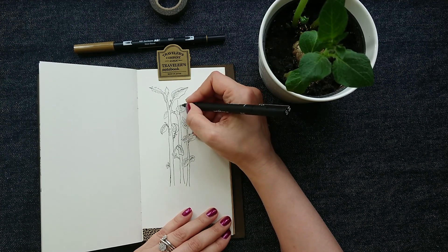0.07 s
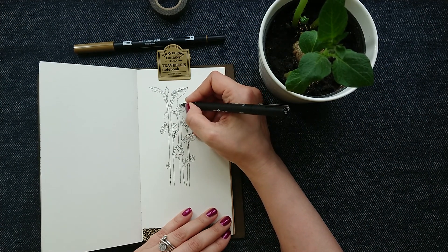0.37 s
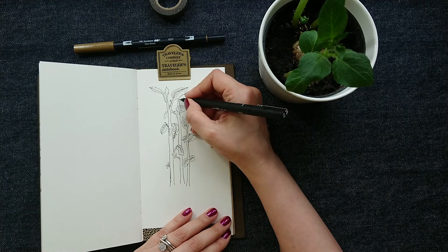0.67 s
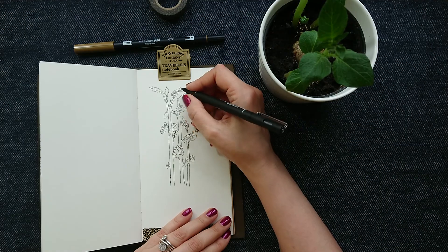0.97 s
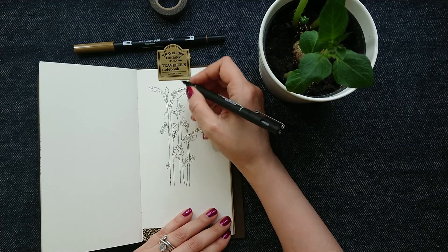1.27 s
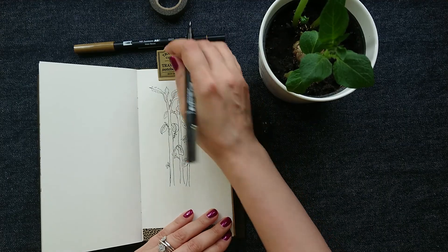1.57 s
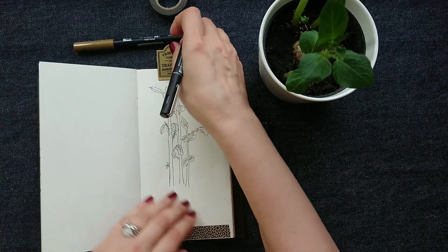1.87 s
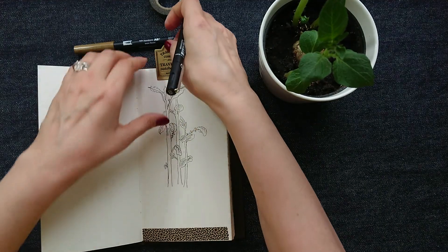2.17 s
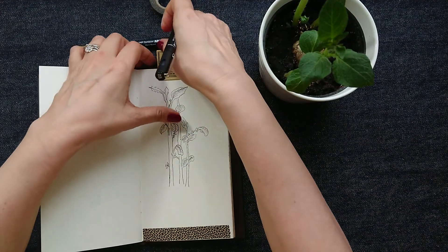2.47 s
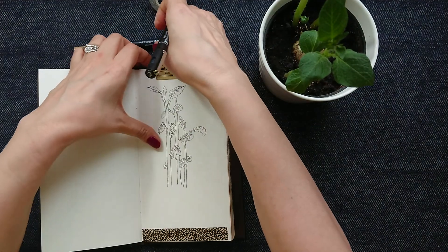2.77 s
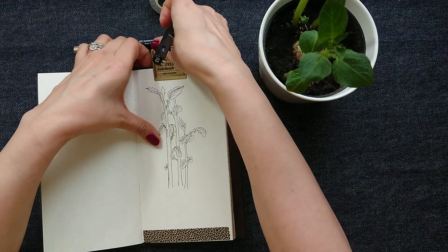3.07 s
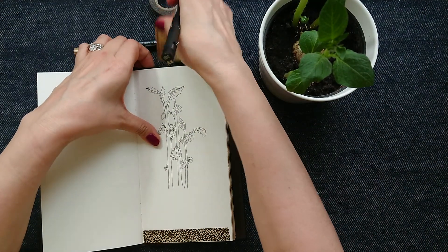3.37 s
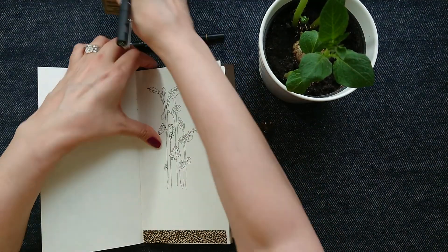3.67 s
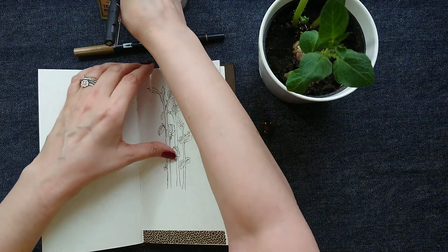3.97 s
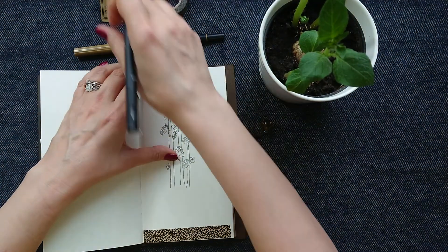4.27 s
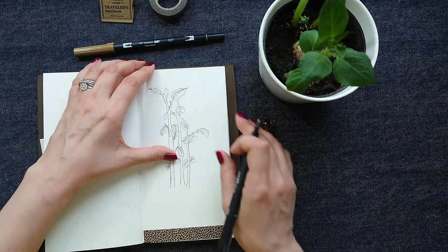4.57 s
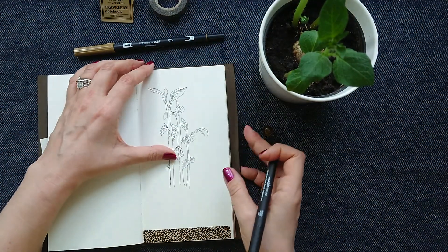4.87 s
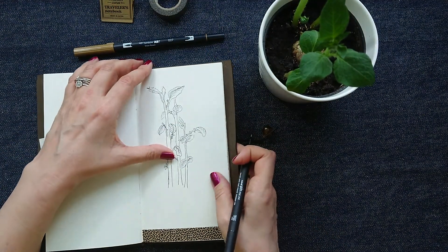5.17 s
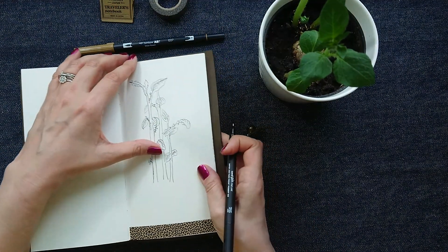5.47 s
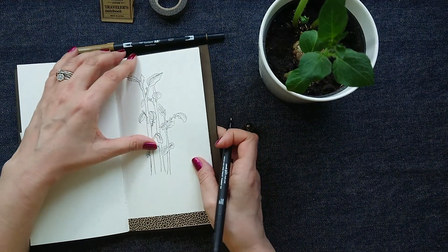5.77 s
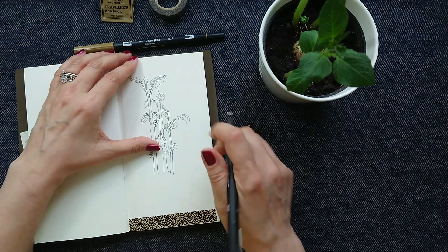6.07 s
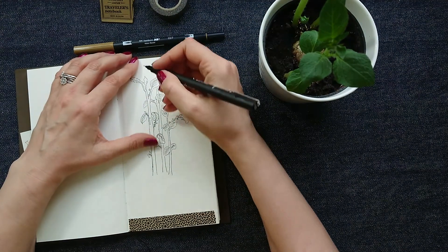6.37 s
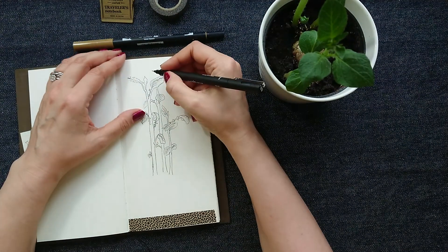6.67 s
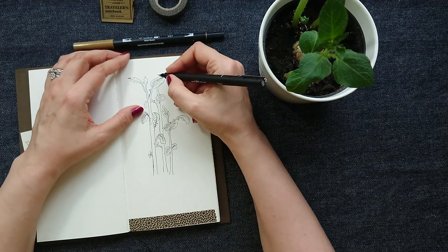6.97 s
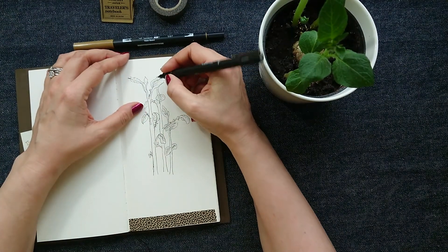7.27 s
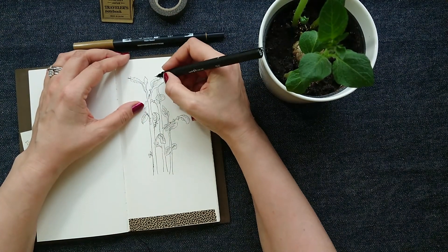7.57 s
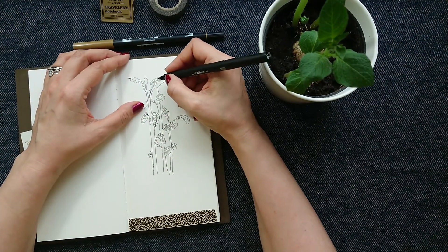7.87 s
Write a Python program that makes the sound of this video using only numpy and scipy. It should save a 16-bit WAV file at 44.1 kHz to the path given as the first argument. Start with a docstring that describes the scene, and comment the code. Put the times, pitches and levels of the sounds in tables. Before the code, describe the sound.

Soft, close hisses of skin on paper open the scene, followed by light clicks and taps as a metal clip is worked off a notebook. It comes loose with a thin snap, and two knocks on the table follow, the second the loudest, with a tiny metallic ring. Dull rubbing on cloth and papery swishes continue until a pen lightly ticks. The room is small and still, with a faint low hum.

```python
"""On a cloth-covered table in a quiet room, someone draws in a notebook, skin hissing over the page.
They stop to take off its metal clip, which clicks, snaps free and is set down with two knocks:
impacts that excite the damped modes of clip and table. Hands and forearms then slide over paper and
cloth with stick-slip friction, nudging the book, and the pen returns to the page with a tick.
A faint hum lies under it all."""
import sys
import numpy as np
from scipy import signal
from scipy.fft import rfft, irfft, next_fast_len
from scipy.io import wavfile
from scipy.ndimage import map_coordinates

SR = 44100
rng = np.random.default_rng(int(sys.argv[2]) if len(sys.argv) > 2 else 0)


def to_wav(s):
    """Save 16-bit WAV."""
    ch = np.atleast_2d(s).T  # columns
    pcm = np.round(np.clip(ch, -1, 1) * 32767)  # PCM
    wavfile.write(sys.argv[1], SR, pcm.astype(np.int16))


N = 354034
TIME = np.arange(N) / SR


# The clip snaps or is touched, then lands. Each row: start in seconds, strength in dB,
# lower and upper cutoff in Hz.
CLIP_SNAPS = [(1.668, -8, 1200, 9400), (1.6695, -15, 1190, 9000), (2.7097, -5.5, 1460, 6000),
              (3.4652, 8, 350, 7440), (3.4659, 8, 4970, 15200), (3.4666, 1, 4000, 15000),
              (3.4685, 3, 1490, 13000), (5.1465, -3, 13000, 15500)]
CLIP_LANDING = [(4.1087, 0.5, 2000, 14990)]
# Its modes, held and free. Each row: frequency in Hz, relative level in dB, T60 in seconds.
HELD_MODES = [(635, -55.5, 0.028), (2400, -50, 0.0057), (5000, -48.5, 0.004), (6150, -46, 0.0031),
              (10000, -44, 0.0055), (12700, -40, 0.0033), (15100, -45, 0.0033)]
FREE_MODES = [(6295, -60.5, 0.21), (6370, -47, 0.037), (10950, -51.5, 0.034), (13450, -66.5, 0.11)]
def metal_clip():
    """Damping: fingers stop the jaws' vibration quickly, while the released clip rings on."""
    held = struck(CLIP_SNAPS, HELD_MODES, crack_db=-52, crack_t60=0.0056)
    free = struck(CLIP_LANDING, FREE_MODES, crack_db=-46.5, crack_t60=0.02)
    return held + free


# Blows on the table. Each row: start in seconds, strength in dB, lower and upper cutoff in Hz.
TABLE_BLOWS = [(2.307, -33.5, 1500, 3500), (2.4592, -31, 1710, 2580), (2.5078, -30, 1036, 2700),
               (2.5125, -34, 950, 2300), (2.516, -29, 1030, 2500), (2.559, -29, 3000, 5030),
               (2.576, -44.5, 300, 1200), (2.7088, -31.5, 120, 680), (2.8098, -29, 1400, 4000),
               (3.2048, -32, 1420, 3260), (3.392, -29, 1900, 2400), (3.8452, -10, 40, 510),
               (3.8455, -26, 493, 1280), (4.107, -10, 287, 1880), (4.1083, 1, 40, 1640),
               (4.7215, -31, 1500, 4500), (4.968, -41, 249, 700), (4.982, -39, 250, 700),
               (6.017, -33, 60, 550), (6.0175, -41.5, 1300, 2200), (6.027, -39, 99.4, 650),
               (6.381, -41, 1300, 1900), (7.5095, -29.5, 1900, 2298)]
# Modes of table and book. Each row: frequency in Hz, relative level in dB, T60 in seconds.
TABLE_MODES = [(44, -42.5, .42), (68, -43, 0.23), (91, -40, 0.063), (121.9, -40, .32), (158.95, -33, 0.14),
               (207, -35, 0.03), (238, -43, .27), (285, -16, 0.025), (387, -43.5, .22), (590, -43, 0.39),
               (660, -12.5, 0.023), (950, -12, 0.019), (1343, -19, .018), (1720, -24, 0.013),
               (2017, -24, .014), (2490, -33.5, .01), (988, -49, .45), (309, -44, 0.21), (1097, -40, .22)]
def table_knocks():
    """Impact excitation: each blow sets the table top ringing at its natural frequencies."""
    return struck(TABLE_BLOWS, TABLE_MODES, crack_db=-19.5, crack_t60=0.0054)


# Low thuds of the table: soft bumps, and the bass of the two loud knocks.
# Each row: start in seconds, relative level in dB, frequency in Hz.
LOW_THUDS = [(0.108, -54, 120), (.52, -61, 70), (1.771, -48.5, 85), (1.773, -52.5, 206), (2.257, -51, 370),
             (2.439, -51.5, 63), (2.708, -51, 91), (3.251, -52.5, 240), (3.401, -51, 150),
             (3.8432, -39, 90), (4.109, -32, 125), (4.721, -44, 246), (6.018, -51.5, 114),
             (7.101, -56.5, 80), (7.51, -47.5, 267)]
def table_thuds(t60_cycles=7.8, rise_s=0.0014, gain_db=3.0):
    """Damped oscillation: a blow through the cloth pushes the table top, which swings a few times."""
    out, t = np.zeros(N + SR), TIME[:SR // 4]
    for start_s, db, hz in LOW_THUDS:
        envelope = (1 - np.exp(-t / rise_s)) * decay(t, t60_cycles / hz)
        start = round(start_s * SR)
        out[start:start + len(t)] += from_db(db + gain_db) * envelope * np.sin(2 * np.pi * hz * t)
    return out[:N]


# The pen's contacts. Each row: start in seconds, strength in dB, lower and upper cutoff in Hz.
PEN_CONTACTS = [(4.1035, -8.5, 2986, 6240), (7.0095, -1.5, 3500, 6130), (7.0112, -10, 3510, 6000),
                (7.1385, -22, 2000, 4460)]
# Its barrel's modes. Each row: frequency in Hz, relative level in dB, T60 in seconds.
BARREL_MODES = [(4330, -41.5, 0.016), (4800, -39, 0.0095), (5750, -39.5, 0.01)]
def pen_ticks():
    """Free vibration: the struck barrel's high, heavily damped modes are heard as a tick."""
    return struck(PEN_CONTACTS, BARREL_MODES, crack_db=-54, crack_t60=0.008)


def struck(contacts, modes, crack_db, crack_t60, scatter_db=1.0):
    """Modal superposition: a contact cracks and rings the modes, duller if soft, thinner if light."""
    out, t = np.zeros(N + SR), TIME[:SR // 2]
    hz, mode_db, t60 = np.transpose(modes)
    rings = np.sin(2 * np.pi * hz[:, None] * t) * decay(t, t60[:, None])
    signs = (-1) ** np.arange(len(modes))
    for start_s, db, low_hz, high_hz in contacts:
        strengths = signs * from_db(mode_db + scatter_db * rng.standard_normal(len(modes)))
        crack = from_db(crack_db) * rng.standard_normal(len(t)) * decay(t, crack_t60)
        thinned = cut(strengths @ rings + crack, low_hz, "high")
        start = round(start_s * SR)
        out[start:start + len(t)] += from_db(db) * cut(thinned, high_hz, "low", order=3)
    return out[:N]


# Skin strokes the page. Each row: start and length in seconds, fraction spent speeding up,
# relative level in dB, treble offset in dB.
SKIN_STROKES = [(1.09, 0.19, 0.81, -77.5, 2), (1.435, 0.065, .4, -82, 11), (1.72, 0.188, 1, -72.5, 2.5),
                (2.157, .13, 0.12, -63, -3), (2.275, 0.069, 0.38, -66.5, -6), (2.36, 0.13, .55, -68.5, -1),
                (2.76, 0.2, 0.6, -72.5, 0), (3.26, 0.14, 0.95, -75, -3), (3.61, .25, 0.74, -74, 0),
                (3.81, .08, 0.74, -68, 2.5), (3.88, 0.21, 0.42, -71.5, 1), (4.43, 0.22, .6, -70.5, -10),
                (4.655, .085, 0.18, -75, 6.5), (4.73, 0.1, 0.68, -74, 6.5), (4.98, 0.23, 0.46, -76.5, 8),
                (5.175, 0.053, 0.46, -73, 5.5), (5.25, 0.49, 0.21, -73.5, -5),
                (5.415, 0.042, 0.36, -66, -8), (5.602, 0.077, 0.39, -59, -15), (5.79, 0.24, 0.74, -77, 0.5),
                (6.195, 0.049, 0.67, -70.5, -2), (6.395, 0.083, .5, -67.5, 2.5),
                (6.46, .22, 0.22, -66, 3.5), (6.58, 0.22, 0.4, -69.5, -7), (6.9, .18, 0.8, -73, 0)]
# The hiss of paper. Each row: frequency in Hz, relative spectral density in dB.
PAPER_SPECTRUM = [(900, -23.5), (2500, -3), (3700, -7.5), (4500, -3.5), (6000, -2), (7600, -1),
                  (9300, -2.5), (11000, -3.5), (12500, -3), (15500, -6.5)]
def paper_hiss(gap_delay_s=0.00016, reflection=0.33, wander=0.11, gain_db=4, light_touch_db=2):
    """Comb filtering: the hiss of skin on paper meets its echo from the changing gap under the hand."""
    stroke, stroke_treble = sliding(SKIN_STROKES)
    idle = fidget(-84)
    hiss = coloured(stick_slip(catches_per_s=16000, spread_db=1.0, judder_db=1.5), PAPER_SPECTRUM)
    lag = gap_delay_s * SR * (1 + wander * drift(19))
    hiss = hiss + reflection * map_coordinates(hiss, [np.arange(N) - lag], order=3)
    idle_treble = from_db(light_touch_db) * idle  # a light touch favours the top octave
    body = np.hypot(stroke, idle) * cut(hiss, 10000, "low", order=3)
    treble = np.hypot(stroke_treble, idle_treble) * cut(hiss, 9200, "high", order=3)
    return from_db(gain_db) * (body + treble)


# Forearm or book drags on the cloth. Each row: start and length in seconds, fraction spent
# speeding up, relative level in dB, rumble offset in dB.
CLOTH_DRAGS = [(.38, 0.28, 0.33, -80, 8.5), (1.76, 0.15, 0.89, -63, 5), (1.895, 0.4, 0.2, -73.5, 6),
               (2.14, 0.23, 0.48, -70, 3.5), (2.36, 0.14, 0.31, -69.5, 1), (2.78, 0.21, 0.25, -73.5, -2),
               (2.98, 0.13, 0.74, -73, 7), (3.23, .12, .7, -73, -8), (3.335, 0.08, 0.88, -63, -8),
               (3.5, 0.92, 0.6, -81, -4), (4.42, 0.41, 0.28, -71, -18), (4.62, 0.36, 0.42, -67, 3.5),
               (4.92, .1, 0.64, -64, 3.5), (5.0, 0.27, 0.12, -67, -0.5), (5.25, 0.41, 0.13, -69, -8),
               (5.602, 0.087, 0.3, -66, -9), (5.78, 0.31, 0.33, -72, -14), (6.195, 0.049, .5, -73, -3),
               (6.45, 0.34, 0.76, -70.5, -11), (6.82, .26, 0.86, -73, -6)]
# The cloth's rub and the table's rumble. Each row: frequency in Hz, relative spectral density in dB.
RUB_SPECTRUM = [(200, -15), (400, -3), (620, -2), (900, -1), (1300, 0.5), (1900, -1), (2300, -8.5),
                (3100, -11), (5000, -20.5), (10000, -39)]
RUMBLE_SPECTRUM = [(25, -24), (45, 0.5), (60, 5), (85, -10), (118, -1), (150, -13), (280, -5.5),
                   (380, -15.5), (700, -25), (2000, -50)]
def cloth_rub(rub_gain_db=1.0, rumble_gain_db=-2.5):
    """Forced vibration: dragging over the weave gives a dull rub and makes the table rumble."""
    drag, drag_rumble = sliding(CLOTH_DRAGS)
    rub_level = from_db(rub_gain_db) * np.hypot(drag, fidget(-82.5))
    rumble_level = from_db(rumble_gain_db) * np.hypot(drag_rumble, from_db(-75))  # never quite still
    rub = coloured(stick_slip(catches_per_s=9000, spread_db=1.0, judder_db=2.0), RUB_SPECTRUM)
    rumble = coloured(stick_slip(catches_per_s=230, spread_db=-1.0, judder_db=-0.5), RUMBLE_SPECTRUM)
    return rub_level * rub + rumble_level * rumble


def stick_slip(catches_per_s, spread_db, judder_db):
    """Stick-slip friction: fibres catch and let go in tiny uneven clicks while the pressure judders."""
    unevenness = from_db(spread_db * np.minimum(rng.exponential(1, N), 4))
    clicks = unevenness * rng.standard_normal(N)
    catches = rng.random(N) < catches_per_s / SR
    return clicks * catches * from_db(judder_db * drift(70))


def sliding(movements, speed_exponent=0.58):
    """Friction noise grows as a power of speed; returns its envelope without and with the offsets."""
    power, offset_power = np.zeros(N), np.zeros(N)
    for start, length, rising, db, offset_db in movements:
        fastest = start + length * np.clip(rising, 0.02, 0.98)
        speed = np.interp(TIME, [start, fastest, start + length], [0, 1, 0])
        rub_power = (from_db(db) * speed ** speed_exponent) ** 2
        power += rub_power
        offset_power += rub_power * from_db(offset_db) ** 2
    return np.sqrt(power), np.sqrt(offset_power)


# The hands' restlessness. Each row: time in seconds, gain in dB.
HAND_UNREST = [(0, -4.5), (.95, -6), (1.3, -0.5), (4.8, 3), (7.3, -0.5), (7.7, -7)]
def fidget(base_db, swing_db=1.5, changes_per_s=9):
    """Random amplitude modulation: the envelope of the hands' small chance movements."""
    return from_db(base_db + in_time(HAND_UNREST) + swing_db * drift(changes_per_s))


# The room's diffuse tail. Each row: frequency in Hz, gain in dB.
TAIL_GAIN = [(50, -8.5), (150, -5), (300, -10), (700, -14.5), (1000, -16), (1700, -9.5), (3000, -4.5),
             (6000, -14), (15000, -10)]
# Its decay. Each row: frequency in Hz, T60 in seconds.
TAIL_T60 = [(100, 0.28), (500, .3), (1000, 0.24), (2000, 0.4), (4000, 0.17), (12000, .17)]
# Reflections from nearby surfaces. Each row: delay in seconds, gain in dB.
EARLY_ECHOES = [(.0042, -22), (0.0177, -20.5), (.021, -28)]
def room(x, build_s=0.0046):
    """Reverberation: a few early echoes and a diffuse tail that builds up and dies band by band."""
    t, edges = TIME[:SR // 2], np.geomspace(40, 16000, 16)
    response = np.zeros(len(t))
    for low, high in zip(edges, edges[1:]):
        hz = np.sqrt(low * high)
        envelope = (1 - np.exp(-(t / build_s) ** 2)) * decay(t, at_hz(TAIL_T60, hz))
        tail = cut(rng.standard_normal(len(t)), [low, high], "band") * envelope
        unity_gain = np.sqrt(2 * (high - low) / SR / len(t))
        response += from_db(at_hz(TAIL_GAIN, hz)) * rms_one(tail) * unity_gain
    for delay_s, db in EARLY_ECHOES:
        response[round(delay_s * SR)] += from_db(db)
    return signal.fftconvolve(x, response)[:N]


# The hum's partials. Each row: frequency in Hz, base level in dB.
HUM_PARTIALS = [(204, -79.5), (407, -85)]
# It swells and sinks. Each row: time in seconds, gain in dB.
HUM_GAIN = [(0, -5), (.8, 1.5), (3.3, 2), (4.5, -5), (5.8, 0.5), (6.05, 4.5), (6.4, 2.5), (6.8, -5.5),
            (8.03, -7)]
def faint_hum(pitch_wander=0.0017, flutter_db=1.1):
    """Frequency and amplitude modulation: two low partials waver in pitch and level."""
    swell_db = in_time(HUM_GAIN)
    phase_per_hz = 2 * np.pi * np.cumsum(1 + pitch_wander * drift(15)) / SR
    hum = np.zeros(N)
    for hz, db in HUM_PARTIALS:
        amplitude = np.sqrt(2) * from_db(db + swell_db + flutter_db * drift(4))
        hum += amplitude * np.sin(hz * phase_per_hz)
    return hum


# The quiet room's air. Each row: frequency in Hz, relative spectral density in dB.
AIR_SPECTRUM = [(20, -26), (35, -14), (56, -2), (88, -11.5), (118, -6), (150, -10), (280, -17),
                (500, -20.5), (1100, -22), (2500, -29.5), (5000, -29.5), (15500, -32.5)]
def still_air(level_db=-70):
    """Stationary noise: a steady broadband floor, strongest in the bass."""
    return from_db(level_db) * coloured(rng.standard_normal(N), AIR_SPECTRUM)


def from_db(db):
    """Decibels as an amplitude ratio."""
    return 10 ** (np.asarray(db) / 20)


def rms_one(x):
    """Normalisation to unit RMS."""
    return x / np.sqrt(np.mean(x ** 2) + 1e-20)


def decay(t, t60):
    """Exponential decay, falling 60 dB in t60 seconds."""
    return np.exp(-np.log(1000) * t / t60)


def in_time(points):
    """Linear interpolation of a curve at every sample."""
    seconds, values = np.transpose(points)
    return np.interp(TIME, seconds, values)


def at_hz(points, hz):
    """Interpolation on a log-frequency axis."""
    known_hz, values = np.transpose(points)
    return np.interp(np.log(hz + 1e-9), np.log(known_hz), values)


def cut(x, hz, kind, order=2):
    """Butterworth filtering; kind names the band that passes."""
    edges = np.clip(hz, 10, 0.47 * SR)
    return signal.sosfilt(signal.butter(order, edges, kind, fs=SR, output="sos"), x)


def coloured(x, spectrum):
    """Spectral shaping of a steady excitation, at unit RMS."""
    size = next_fast_len(N)
    bins = rfft(x, size)
    gains = from_db(at_hz(spectrum, np.arange(len(bins)) * SR / size))
    return rms_one(irfft(bins * gains, size)[:N])


def drift(rate_hz):
    """Slow random fluctuation at unit RMS."""
    knots = rng.standard_normal(4096)
    return rms_one(np.interp(TIME * rate_hz, np.arange(len(knots)), knots))


def scene():
    """Direct and reverberant sound: knocks fill the room; small sounds, shielded by hands, stay close."""
    knocks = table_knocks() + table_thuds()
    close = metal_clip() + pen_ticks() + paper_hiss() + cloth_rub()
    reverberation = room(knocks + from_db(-4.5) * close)
    return (knocks + close + reverberation + faint_hum() + still_air())[None]


def record(dry, low_hz=29, high_hz=15800):
    """Band limiting: the microphone drops the deepest bass, and the top is cut steeply."""
    lowpass = signal.ellip(12, 0.1, 70, high_hz, fs=SR, output="sos")
    return signal.sosfilt(lowpass, cut(dry, low_hz, "high", order=4))


dry = scene()
out = record(dry)
to_wav(out)
```